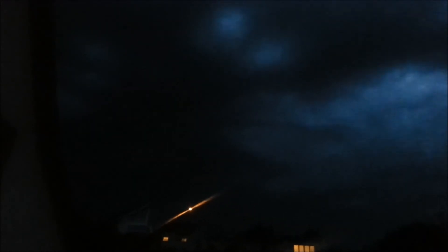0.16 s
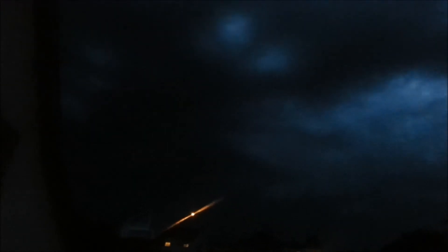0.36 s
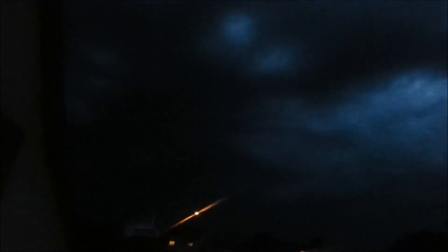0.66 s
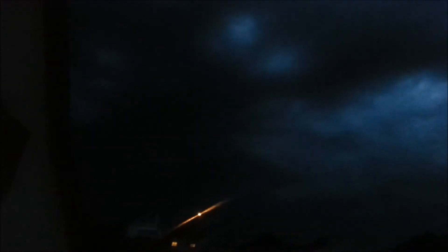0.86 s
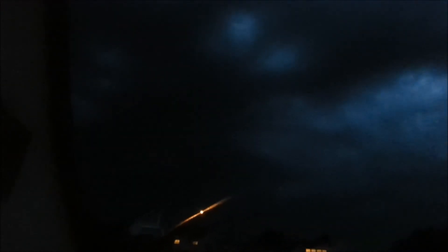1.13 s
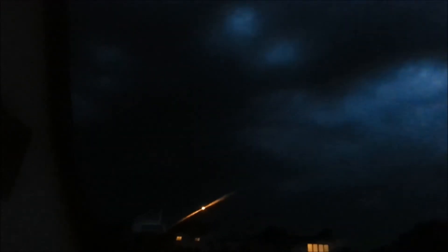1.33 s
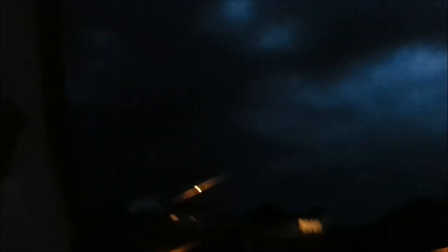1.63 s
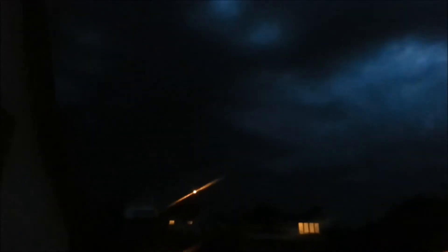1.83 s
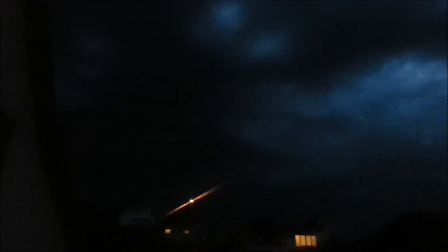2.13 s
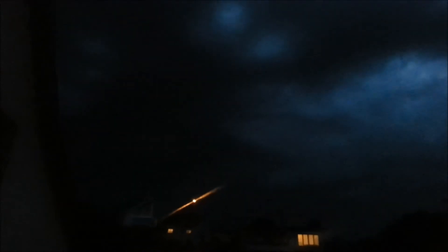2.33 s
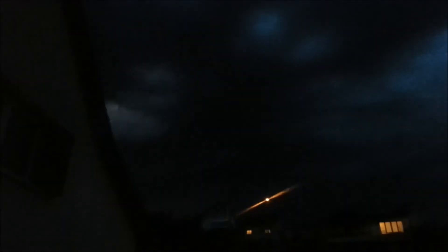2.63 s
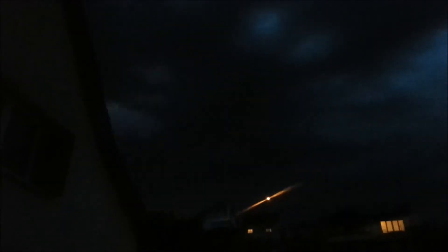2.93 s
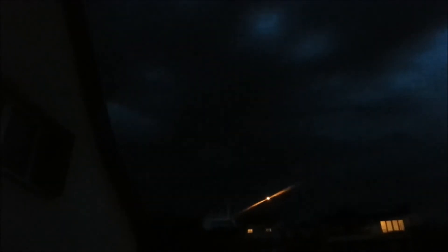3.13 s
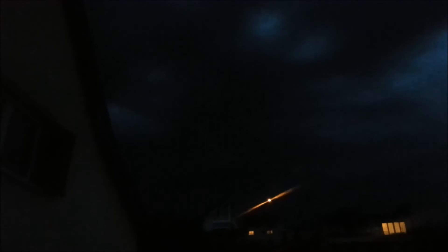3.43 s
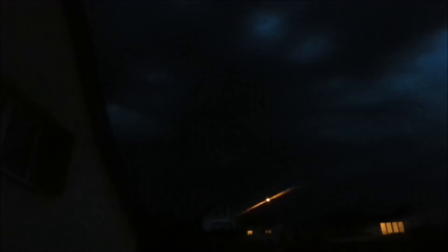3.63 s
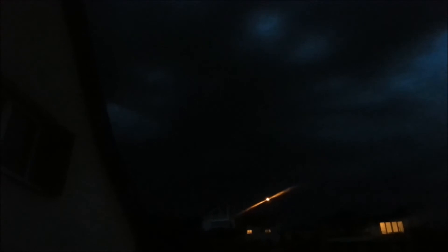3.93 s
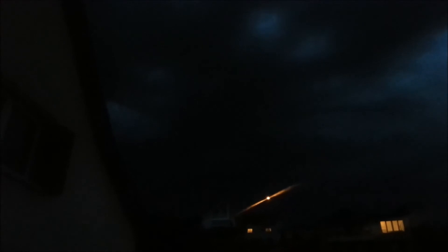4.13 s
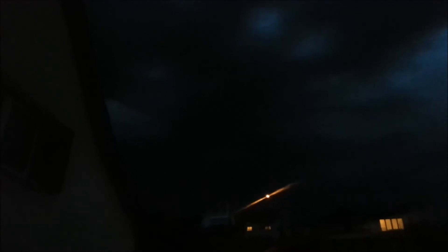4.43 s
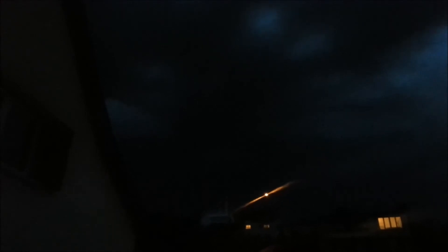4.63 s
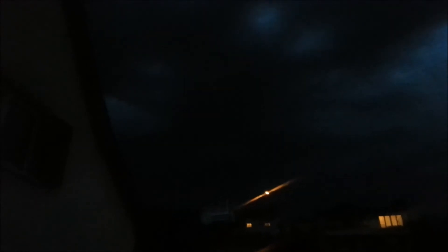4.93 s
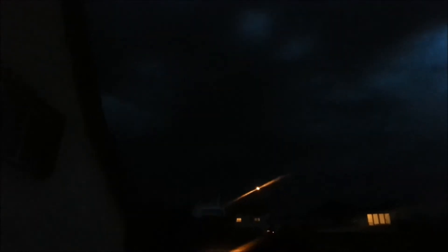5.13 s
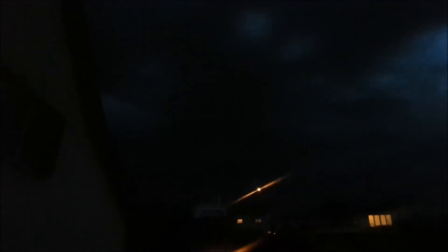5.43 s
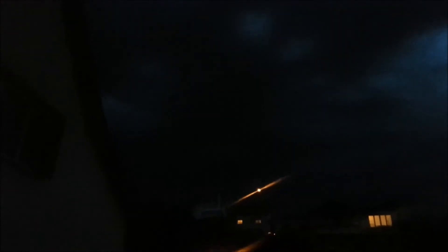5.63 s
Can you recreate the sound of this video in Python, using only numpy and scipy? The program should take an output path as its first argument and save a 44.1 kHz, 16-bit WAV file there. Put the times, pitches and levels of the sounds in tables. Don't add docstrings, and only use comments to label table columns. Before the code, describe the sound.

Quiet stereo outdoor pickup: bassy evening hush, fading soft thunder, clear and rough bird whistles, then a swelling buzzy trill. Just before three seconds, small ticks and an abrupt change. Thunder starts again as scattered low crackles, erupts after four seconds into heavy booms, eases briefly, and strikes again even fuller, echoing off houses.

```python
import sys
import numpy as np
from scipy import signal
from scipy.fft import rfft, irfft
from scipy.io import wavfile
from scipy.ndimage import uniform_filter1d, map_coordinates

SR = 44100
rng = np.random.default_rng(int(sys.argv[2]) if len(sys.argv) > 2 else 0)


def unload_audio(sound):
    columns = np.transpose(np.atleast_2d(sound))
    steps = np.round(np.clip(columns, -1, 1) * 32767)
    wavfile.write(sys.argv[1], SR, steps.astype(np.int16))


def to_linear_factor(level_db):
    exponent = np.asarray(level_db, float) / 20
    return 10 ** exponent


N = 254279
TIME = np.arange(N) / SR
COARSE = TIME[::32]
CHANGE_S = 2.804


def unit(x):
    return x / np.sqrt(np.mean(x ** 2))


def band(x, lo_hz, hi_hz, order=2):
    return signal.sosfilt(signal.butter(order, [lo_hz, hi_hz], "band", fs=SR, output="sos"), x)


def low(x, hz, order):
    return signal.sosfilt(signal.butter(order, hz, fs=SR, output="sos"), x)


def pan(x, db):
    return x * to_linear_factor(np.array([db, -db]).reshape(2, -1) / 2)


def echo(x, t60, wet_db):
    t = TIME[:SR // 2]
    decay = np.exp(-np.log(1000) * t / t60)
    tail = rng.standard_normal((2, len(t))) * decay * np.minimum(t / 0.0029, 1)
    tail = tail / np.sqrt(np.sum(tail ** 2, axis=1, keepdims=True))
    return x + to_linear_factor(wet_db) * signal.fftconvolve(x, tail, axes=1)[:, :N]


def walk(rate):
    hold = int(SR / rate)
    steps = np.repeat(rng.standard_normal(N // hold + 1), hold)
    return uniform_filter1d(steps, hold)[:N]


def coloured(points, side_db):
    hz, db = np.transpose(points)
    mid, side = rng.standard_normal((2, N))
    side = to_linear_factor(side_db) * side
    gain = to_linear_factor(np.interp(np.log(np.fft.rfftfreq(N, 1 / SR) + 1), np.log(hz), db))
    return unit(irfft(rfft([mid + side, mid - side]) * gain, N))


def swells(table, octave, spread_db, rise):
    power = 0
    for s, db, pitch, fall_s in table:
        away = np.maximum(COARSE - s, (s - COARSE) / rise) / max(fall_s, .01)
        power = power + to_linear_factor(2 * (db - spread_db * (octave - pitch) ** 2 - 20 * away))
    return power


def strength(octave, farthest_db, colour_db):
    # t/s, level/dB, loudest pitch/octaves above 100 Hz
    bed = [(0, -49, 0), (.8, -53, -1), (1.0, -57, 0.75), (1.25, -65, 1.7), (2.85, -65.5, 2.5),
           (3.03, -52.5, 2.5), (3.75, -48.5, 2.5), (3.9, -54, 2), (3.97, -35, 0.57), (4.2, -32, 0.85),
           (4.7, -37.5, 1.11), (4.95, -33.5, 1), (5.155, -33.5, 1.09), (5.2, -22.5, 0.07),
           (5.42, -28, 0.52), (5.62, -27.5, 0.68), (5.77, -26, 0.6)]
    # peak t/s, peak level/dB, pitch/octaves above 100 Hz, time to fall 20 dB/s
    ebb = [(.02, -53, 1.7, 0), (.15, -56, -0.35, 1), (.17, -45, 0.74, -1), (.32, -47, 1.08, 0.36),
           (.57, -47.5, 1.2, 0.16), (.6, -48, -1.5, 0), (.64, -44.5, 1.5, 0), (.71, -44.5, 0.95, 0.11),
           (.78, -48, 1.38, 0.13), (.86, -55, 0.73, -0.07), (1.345, -47.5, -1.75, 0.17)]
    first = [(3.1, -45, 1.04, 0.12), (3.24, -48, 1.5, 0.099), (3.4, -46.5, 2, 0.087),
             (3.49, -48.5, 1.7, 0.054), (3.56, -48, 2.3, 0.027)]
    thuds = [(3.4, -49.5, 0.64, 0.09), (3.5, -50, 0.42, 0.14), (3.1, -45.5, 0.42, 0.093),
             (3.72, -54, 0.44, 0.11), (3.8, -49, 0.31, 0.13), (2.36, -57, -0.9, 0.18),
             (2.09, -63.5, 0.62, 0.62), (2.53, -65, 0.63, 0.73), (2.71, -61, .8, 0.37), (3.8, -56, .4, .1),
             (3.6, -52.5, 0.49, 0.13), (1.82, -63, 0, 0.18), (5.2, -34, -0.52, .1), (4.8, -35, -0.63, .12),
             (1.62, -56, 0.27, .12), (3.29, -51, .6, 0.12), (3, -60.5, -0.36, .15), (.75, -50, -0.22, .08)]
    booms = [(3.96, -35.5, 1.05, 0.1), (4.22, -21.5, 0.59, 0.18), (4.26, -35, 0.19, 0.017),
             (4.32, -38, -0.58, 0.027), (4.39, -24, 0.95, 0.099), (4.5, -27, 1.49, 0.069),
             (4.535, -16.5, 0.25, 0.12), (4.585, -25.5, 1.17, 0.15), (4.615, -15.5, -0.12, 0.063),
             (4.65, -25.5, 0.32, 0.11), (4.69, -30.5, 0.83, 0.18), (4.83, -36, 0.92, 0.33),
             (4.92, -43, -1.2, 0.18), (5.12, -39, 0.9, 0.049), (5.172, -16, 0.67, 0.017),
             (5.19, -17.5, 0.27, 0.062), (5.25, -27, 0.58, 0.074), (5.28, -36, 0.84, 0.023),
             (5.32, -16.5, -0.44, 0.05), (5.335, -14.5, 0.62, 0.1), (5.39, -14.5, 0.5, 0.04),
             (5.44, -22, -0.57, 0.028), (5.49, -16, 0.69, 0.038), (5.53, -22, 0.34, 0.094),
             (5.6, -27, -0.69, 0.072), (5.67, -20, 0.58, 0.078), (5.7, -17.5, 1.42, 0.015),
             (5.705, -26, -0.94, 0.064), (5.72, -17, 0.59, 0.076)]
    s, db, pitch = np.transpose(bed)
    bed_db = np.interp(COARSE, s, db) - 4.5 - 2.5 * (octave - np.interp(COARSE, s, pitch)) ** 2
    power = to_linear_factor(2 * farthest_db) + to_linear_factor(2 * bed_db)
    power = power + swells(ebb, octave, spread_db=10.5, rise=0.93)
    power = power + swells(first, octave, spread_db=1.0, rise=0.53)
    power = power + swells(thuds, octave, spread_db=20, rise=0.81)
    power = power + to_linear_factor(2 * colour_db) * swells(booms, octave, spread_db=9.5, rise=0.65)
    return np.interp(TIME, COARSE, np.sqrt(power))


def roll():
    # low f/Hz, high f/Hz, skirt order, front rate/s^-1, size scatter/dB, side level/dB,
    # share of the lean/1
    parts = [(26.4, 57, 2, 46, 7, -12.5, 0), (73.3, 131.5, 3, 160, 5, -15.5, 0.05),
             (122.5, 218.5, 3, 320, 0.5, -14, 0), (216, 374, 2, 590, 3, -11.5, 0.2),
             (377, 605, 2, 900, 6, -7.5, 0.78), (651, 810, 1, 1200, -0.5, -5, 0.8),
             (1040, 1455, 2, 4000, 14, -8.5, 0.9)]
    farthest_db = (-57, -74, -67, -77.5, -71, -81, -84)
    boom_colour_db = (-1.5, -2.5, -1.64, 1.5, -26.5, 8, -2.5)
    # t/s, lean to the left/dB, extra width/dB
    drift = [(0, 12.5, 7), (1.0, 9, 13), (2.849, 10, 11.5), (3.05, -0.5, -0.5), (3.85, 2, 3), (4.1, 0, 4.5),
             (5.77, 0.7, 1.5)]
    at, lean, width = np.transpose(drift)
    lean_db, wide_db = np.interp(TIME, at, lean), np.interp(TIME, at, width)
    when, size, sign = rng.random((3, N))
    out = 0
    for part, floor_db, colour_db in zip(parts, farthest_db, boom_colour_db):
        lo_hz, hi_hz, steep, rate, scatter_db, side_db, share = part
        fronts = (when < rate / SR) * np.sign(sign - .5) * to_linear_factor(-scatter_db * np.log(size + 0.12))
        sources = (fronts, *rng.standard_normal((2, N)))
        near, far, side = (unit(band(x, lo_hz, hi_hz, order=round(steep))) for x in sources)
        mid = near + 0.87 * far
        mid = unit(mid / np.sqrt(uniform_filter1d(mid ** 2, size=SR // 14)))
        side = side * np.minimum(to_linear_factor(side_db + wide_db), 1)
        octave = np.log2(lo_hz * hi_hz / 100 ** 2) / 2
        stereo = pan(np.array([mid + side, mid - side]), share * lean_db)
        out = out + strength(octave, floor_db, colour_db) * stereo
    return out


def claps():
    # t/s, peak level/dB, f/Hz, ring time/s
    strong_fronts = [(4.182, -39, 81.5, 0.08), (4.185, -7.5, 164, 0.26), (4.383, -13, 240, 0.16),
                     (4.488, -8, 231, 0.075), (4.572, -16, 82, 0.039), (4.57, 6, 135.2, 0.096),
                     (4.817, -10.5, 186, 0.067), (4.85, -18.5, 158, 0.37), (5.088, -14.5, 271.7, 0.47),
                     (5.164, -9.5, 184, 0.11), (5.318, 0.5, 125, 0.22), (5.379, 4, 171, 0.047),
                     (5.442, -3, 177, 0.17), (5.484, 4, 141.3, 0.054), (5.694, -4, 306, 0.065),
                     (5.698, 0.5, 158.6, 0.26)]
    out, t = np.zeros((2, N + SR)), TIME[:SR // 4]
    for s, db, hz, ring_s in strong_fronts:
        fade = np.exp(-np.log(1000) * t / np.clip(ring_s, .01, .3))
        front = (1 - 2 * t * hz) * (t * hz < 1)
        ring = np.sin(2 * np.pi * hz * t) * fade
        rattle = unit(band(rng.standard_normal((2, len(t))), 340, 1200)) * fade
        clap = 0.097 * front + 0.41 * ring + 0.02 * rattle
        out[:, int(s * SR):int(s * SR) + len(t)] += to_linear_factor(db - 2.5) * clap
    return band(out[:, :N], 71, 1000)


def crackle():
    # t/s, peak level/dB, centre f/Hz, length/s, bright edge level/dB
    bursts = [(2.923, -60, 285, 0.056, 6), (2.98, -36.5, 297, 0.032, -14), (3.047, -40.5, 1010, 0.08, -22),
              (3.091, -41, 318, 0.058, -4), (3.103, -34, 307, 0.054, -18), (3.157, -41.5, 257, 0.13, -3.5),
              (3.229, -22, 510, 0.02, -23), (3.336, -41.5, 885, 0.1, -7), (3.365, -29.5, 296, 0.045, -13),
              (3.414, -40, 272, 0.056, -3), (3.474, -37, 315, 0.053, -10), (3.527, -33, 380, 0.12, -11),
              (3.555, -36, 606, 0.028, -20), (3.63, -37.5, 300, 0.055, -9), (3.71, -34, 367, 0.12, -18),
              (3.741, -37.5, 1230, 0.046, -30)]
    out, t = np.zeros((2, N)), TIME[:SR // 5]
    for s, db, hz, length_s, edge_db in bursts:
        mid, side, edge = rng.standard_normal((3, len(t)))
        swarm = unit(band(mid, hz / 1.4, hz * 1.4)) + to_linear_factor(edge_db) * unit(band(edge, 1100, 2400))
        wide = 0.17 * unit(band(side, hz / 1.5, hz * 3.6))
        shape = np.minimum(t / 0.0023, 1) * np.exp(-t / np.clip(length_s / 2, .004, .05))
        burst = shape * np.array([swarm + wide, swarm - wide])
        out[:, int(s * SR):int(s * SR) + len(t)] += to_linear_factor(db - 10.5) * burst
    return out


def snaps():
    # t/s, peak level/dB, centre f/Hz, length/s
    edges = [(2.93, -42.5, 1320, 0.017), (3.046, -43, 1060, .02), (3.093, -37, 1200, 0.021),
             (3.154, -43, 1200, .02), (3.196, -45, 1500, 0.016), (3.366, -39, 1000, 0.017),
             (3.392, -44, 1240, 0.015), (3.481, -43, 1200, 0.027), (3.633, -42, 1300, 0.024),
             (3.708, -39, 1070, .02), (3.932, -45, 1080, .03), (4.025, -48, 1140, 0.036),
             (4.098, -41, 920, 0.047), (4.145, -39, 890, 0.028), (4.248, -47, 1520, .02),
             (4.341, -35, 750, 0.047), (4.378, -41.5, 1300, 0.035), (4.495, -37, 1400, 0.013),
             (4.53, -36.5, 1280, 0.045), (4.569, -32.5, 1500, 0.0086), (4.765, -42, 1080, 0.017),
             (4.873, -52, 1020, .02), (4.937, -40.5, 1070, 0.024), (5.049, -41.5, 910, 0.027),
             (5.113, -43.5, 1040, 0.025), (5.165, -39, 686, .025), (5.278, -47.5, 1090, .02),
             (5.315, -36, 955, 0.032), (5.335, -30.5, 1300, 0.018), (5.479, -36, 885, .025),
             (5.544, -51, 1090, 0.015), (5.66, -37.5, 1700, .015), (5.695, -36, 1090, 0.016),
             (2.927, -46.5, 2000, 0.0099), (3.048, -42, 1300, 0.0073), (3.089, -37, 1000, .008),
             (3.48, -37, 900, .012), (3.737, -38.5, 1390, .012), (4.348, -28, 800, .008),
             (3.562, -45, 1500, 0.018), (3.415, -43, 1200, .02), (3.242, -39, 1400, 0.026)]
    out, t = np.zeros((2, N + SR)), TIME[:SR // 5]
    for s, db, hz, length_s in edges:
        mid, side = (unit(band(x, hz / 1.8, hz * 1.33)) for x in rng.standard_normal((2, len(t))))
        shape = np.minimum(t / 0.0018, 1) * np.exp(-t / np.clip(length_s, .003, .06))
        splash = shape * np.array([mid + 0.38 * side, mid - 0.17 * side])
        out[:, int(s * SR):int(s * SR) + len(t)] += to_linear_factor(db - 11.0) * splash
    return out[:, :N]


def knocks():
    # t/s, peak level/dB, f/Hz, length/s
    rings = [(0.294, -69, 330, 0.047), (0.598, -46, 420, 0.054), (0.685, -49, 406, 0.079),
             (0.803, -51, 430, 0.048), (2.98, -49.5, 155, 0.11), (3.08, -40, 155, 0.076),
             (3.1, -46.5, 817, 0.033), (3.229, -33.5, 593, 0.021), (3.237, -49.5, 1095, 0.035),
             (3.334, -48.5, 830, 0.036), (3.373, -45.5, 560, 0.032), (3.4, -47.5, 825, .05),
             (3.433, -44.5, 590, 0.026), (3.478, -39, 304, 0.05), (3.546, -42.5, 640, 0.046),
             (3.55, -43.5, 396, 0.034), (3.632, -44, 297, 0.048), (3.712, -49, 340, 0.067),
             (3.71, -48, 150, 0.039), (3.739, -44.5, 1300, 0.026), (3.742, -42, 1520, 0.03),
             (3.076, -43, 270, 0.019), (4.149, -29.5, 274, 0.13), (4.298, -32, 289, 0.082),
             (4.489, -25, 330.4, 0.019), (4.12, -37, 627, 0.046), (4.36, -38.5, 730, 0.046),
             (5.338, -13, 128, 0.036), (5.029, -32.5, 370, 0.062), (5.165, -20.5, 293, 0.032),
             (5.173, -33, 680, 0.028), (5.205, -20.5, 155, 0.034), (5.21, -24, 296, 0.025),
             (5.311, -14.5, 260, 0.03), (5.323, -20, 400.7, 0.049), (5.323, -31, 698, 0.059),
             (5.321, -38.5, 1070, 0.043), (5.477, -35, 950, 0.023), (5.476, -22, 290, 0.028),
             (5.54, -22.5, 140, 0.046), (5.691, -25, 705, 0.02), (4.76, -38.5, 65, .09),
             (4.135, -27, 205, 0.037), (4.4, -37, 80, .05), (5.37, -26.5, 60, .05), (6.1, -28.5, 65, .05),
             (4.3, -29, 95, .04), (5.205, -24, 174, .03), (4.635, -29, 285, .03)]
    path_wobble_s = .002
    out = np.zeros(N)
    wobble = walk(160)
    for s, db, hz, length_s in rings:
        done = np.clip((TIME - s) / max(length_s, .01), 0, 1)
        phase = hz * (2 * np.pi * (TIME - s) + path_wobble_s * wobble)
        out += to_linear_factor(db) * np.sin(np.pi * done ** 0.58) * np.sin(phase)
    return pan(out * to_linear_factor(2.9 * wobble), 1.7)


def street(x):
    # f/Hz, width/Hz, level/dB
    modes = [(66, 8.3, 0.5), (134, 22, 2), (240, 12, 4.5), (679, 30, 2.5), (83, 9.4, -2.5), (537, 89, -2)]
    out = x
    for hz, width_hz, db in modes:
        out = out + (to_linear_factor(db) - 1) * signal.lfilter(*signal.iirpeak(hz, hz / width_hz, fs=SR), x)
    return out


def thunder():
    distant = low(roll() + echo(claps(), .4, -9), 2000, order=8)
    out = distant + echo(crackle(), .15, -9) + echo(snaps() + knocks(), 0.089, -5.5)
    difference = low(out[0] - out[1], 600, order=1) / 2
    return street(out - 0.47 * difference * np.array([[1], [-1]]))


def notes(rows, throb_hz, swing, pan_db, rough_first, rough_last, ease=1):
    attack, release = 0.28, 0.45
    start_db, end_db = -5.5, -2
    out = np.zeros(N)
    for start, length, db, first_hz, last_hz in rows:
        done = np.clip((TIME - start) / length, 0, 1)
        rough = np.clip(rough_first + (rough_last - rough_first) * done, 0, 1)
        level_db = db + np.interp(done, [0, attack, 1 - release, 1], [start_db, 0, 0, end_db])
        shake = rough * np.sin(2 * np.pi * np.cumsum(throb_hz * (1 + 0.14 * walk(30))) / SR)
        bend = 1 + 0.00427 * walk(90) + swing * (shake + 1.8 * rough ** 2 * walk(400))
        gate = np.clip(np.minimum(done, 1 - done) * length / 0.00091, 0, 1)
        hz = first_hz + (last_hz - first_hz) * (1 - (1 - done) ** ease)
        tone = np.sqrt(2) * np.sin(2 * np.pi * np.cumsum(hz * bend) / SR)
        out = out + tone * (1 + shake) * gate * to_linear_factor(level_db)
    return pan(out, pan_db)


def near_birds():
    # start t/s, length/s, level/dB, first f/Hz, last f/Hz
    song = [(.545, 0.049, -63, 2105, 1976), (.675, 0.13, -54.5, 2000, 2170),
            (.998, 0.041, -55.5, 2085, 1965), (1.04, 0.054, -53.5, 1956, 2085),
            (1.25, 0.13, -58.5, 1637, 1955), (1.365, 0.086, -57.5, 1954, 2078),
            (1.575, 0.082, -59.5, 1820, 1705), (1.63, 0.1, -67.5, 1607, 1703),
            (2.14, 0.1, -66.5, 1685, 1954), (3.408, 0.03, -55.5, 2025, 2070)]
    chirps = [(.6, 0.068, -61.5, 2770, 2810), (.65, 0.04, -73, 3150, 3230), (.68, 0.081, -69, 2800, 2800),
              (.788, 0.053, -53, 2336, 1980), (.83, 0.033, -59.5, 1780, 1830),
              (2.245, .055, -56, 2570, 2050), (2.26, 0.078, -70, 2720, 2700),
              (2.29, 0.068, -68, 2740, 2740)]
    pips = [(1.75, 0.11, -58, 2675, 2530), (1.82, 0.021, -57, 2360, 2300),
            (1.865, 0.075, -54.5, 2590, 2540), (1.945, 0.087, -63, 2600, 2534),
            (3.05, 0.07, -63, 2620, 2560)]
    faint = [(1.1, 0.03, -83, 4050, 3350), (1.085, 0.025, -85, 4150, 4100), (3.13, 0.12, -75, 3540, 3380),
             (3.58, 0.12, -74, 3270, 3290)]
    glide = [(1.205, .3, -81, 2750, 4120)]
    out = notes(song, 52, swing=0.027, pan_db=14, rough_first=.08, rough_last=.3)
    out = out + notes(chirps, 95, swing=0.031, pan_db=7.5, rough_first=0.526, rough_last=0.74)
    out = out + notes(pips, 95, swing=0.011, pan_db=6.5, rough_first=0.25, rough_last=0.58)
    out = out + notes(faint, 80, swing=0.011, pan_db=20.5, rough_first=0.49, rough_last=0.59)
    return out + notes(glide, 80, swing=.012, pan_db=9, rough_first=.6, rough_last=.7, ease=2.4)


def trill():
    # start t/s, length/s, level/dB, first f/Hz, last f/Hz
    held = [(1.775, 0.093, -68, 2024, 1950), (1.88, 0.21, -67.5, 1974, 2060),
            (2.41, 0.16, -65.5, 2067, 2000), (2.53, 0.16, -68, 2015, 1950), (2.715, 0.19, -69, 2120, 1930)]
    return notes(held, 85, swing=0.0506, pan_db=8.0, rough_first=0.45, rough_last=0.7)


def buzz():
    start_s, peak_s, end_s = 1.87, 2.36, 2.71
    peak_db, start_db, end_db = -56.5, -80, -64.5
    first_hz, last_hz, sweeps_per_s = 4320, 3600, 146
    peak_sweep_hz, start_sweep_hz, end_sweep_hz = 680, 230, 560
    rising = TIME < peak_s
    late_s = np.maximum(TIME - end_s, 0)
    effort = 1 - np.interp(TIME, [start_s, peak_s, end_s], [1, 0, 1]) ** 2.1
    db = peak_db + (np.where(rising, start_db, end_db) - peak_db) * (1 - effort)
    db = db - 120 * late_s
    hz = np.interp(TIME, [start_s, end_s], [first_hz, last_hz])
    opening = effort ** np.where(rising, 1.3, .7)
    edge_hz = np.where(rising, start_sweep_hz, end_sweep_hz)
    depth_hz = peak_sweep_hz + (edge_hz - peak_sweep_hz) * (1 - opening)
    depth_hz = depth_hz * np.exp(-late_s / .12)
    cycle = np.cumsum(sweeps_per_s * (1 + .16 * walk(100))) / SR % 1
    swept_hz = hz * (1 + .013 * walk(150)) + depth_hz * (1 - 2 * cycle)
    phase = 2 * np.pi * np.cumsum(swept_hz) / SR
    swell = np.sin(np.pi * cycle) ** .35 * to_linear_factor(2.2 * walk(250))
    tone = swell * (np.sin(phase) + to_linear_factor(-44) * np.sin(2 * phase))
    return pan(unit(tone) * to_linear_factor(db) * (TIME > start_s), 5.5)


def birds():
    near = echo(near_birds(), .5, -6.5)
    distant = echo(trill() + buzz(), .3, -2) * to_linear_factor(2.5)
    near = np.array([near[0], np.roll(near[1], 11)])
    return near + np.array([np.roll(distant[0], 2), distant[1]])


def ticks():
    # t/s, peak level/dB, left minus right/dB
    impulses = [
        (2.7005, -63, 5.0),
        (2.712, -53, 19),
        (2.7553, -53, 11),
    ]
    out = np.zeros((2, N))
    for s, db, pan_db in impulses:
        out[:, int(s * SR)] = to_linear_factor(db + 16.5 + np.array([pan_db, -pan_db]) / 2)
    return band(out, 3500, 6100, order=1)


def dusk():
    # f/Hz, level per Hz/dB
    hush = [(15, 3.5), (25, 0), (50, -11.5), (110, -15.5), (300, -13.5), (500, -20), (1100, -18.5),
            (1600, -25.5), (2700, -32.5), (5000, -41), (9300, -49.5), (16000, -57)]
    return pan(coloured(hush, -0.4), 3.8) * to_linear_factor(-56.5 + 0.58 * walk(5.34))


def after_hiss():
    # f/Hz, level per Hz/dB
    hiss = [(900, -71), (1600, -10), (2400, -0.5), (3700, -6), (7300, -10), (7700, -26.5), (9000, -33),
            (16000, -38)]
    after = np.clip((TIME - CHANGE_S) / .15, 0, 1)
    return after * coloured(hiss, -0.23) * to_linear_factor(-64.5 + 0.88 * walk(18))


def scene():
    return thunder() + birds() + ticks() + dusk() + after_hiss()


def band_limit(x):
    return signal.sosfilt(signal.butter(12, 16830, fs=SR, output="sos"), x)


def record(dry):
    slip_hz = (3712, 3902)
    full = .55
    rounded = dry / (1 + np.abs(dry / full) ** 5) ** (1 / 5)
    slip = np.cumsum(np.where(TIME < CHANGE_S, *slip_hz)) / SR % 1 - .5
    places = np.arange(N) + 0.87 * slip
    moved = np.array([map_coordinates(side, [places], order=3, mode="nearest") for side in rounded])
    moved = signal.sosfilt(signal.ellip(10, .2, 60, 15750, fs=SR, output="sos"), moved)
    return band_limit(moved)


dry = scene()
out = record(dry)
unload_audio(out)
```